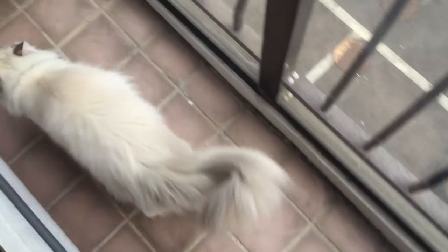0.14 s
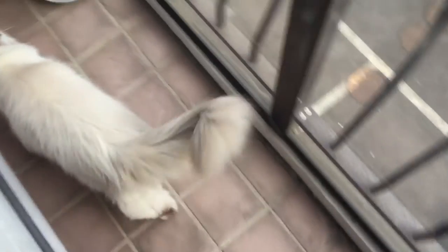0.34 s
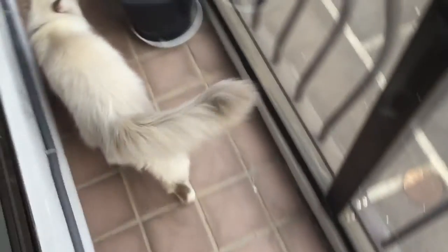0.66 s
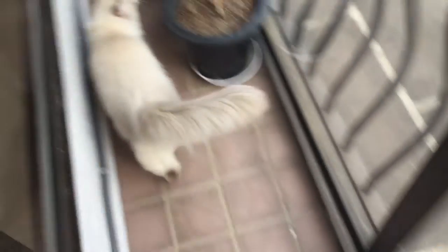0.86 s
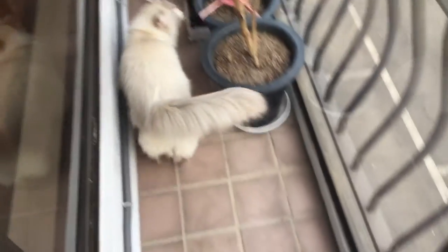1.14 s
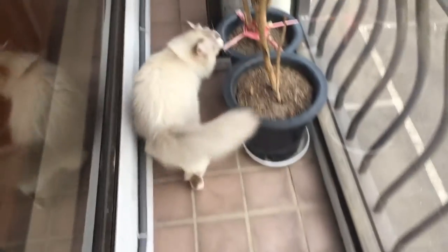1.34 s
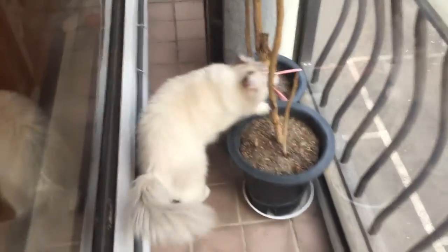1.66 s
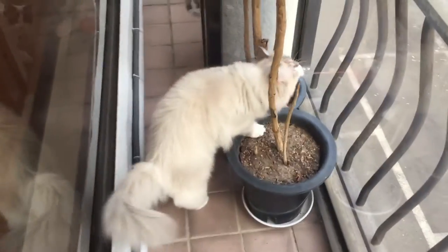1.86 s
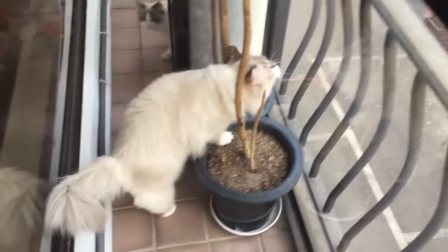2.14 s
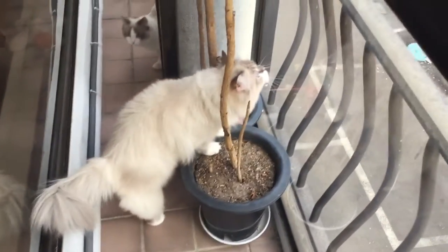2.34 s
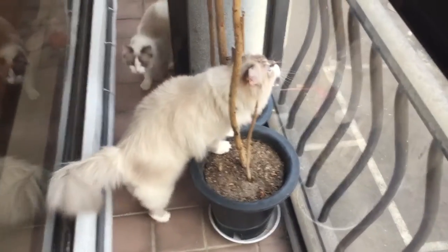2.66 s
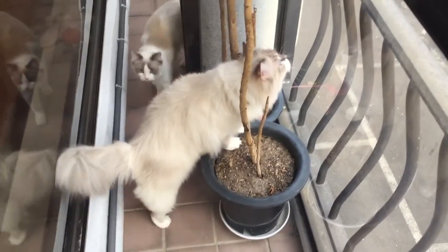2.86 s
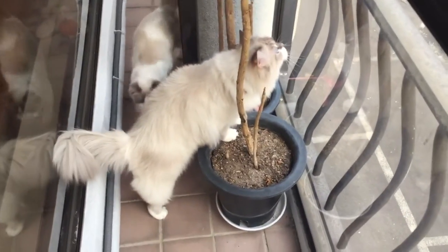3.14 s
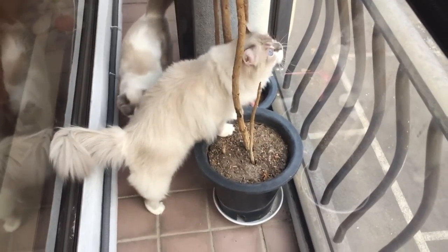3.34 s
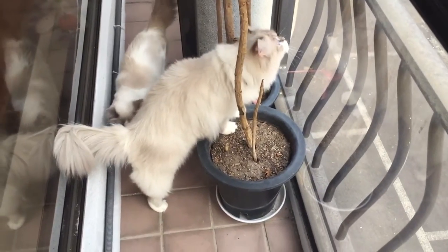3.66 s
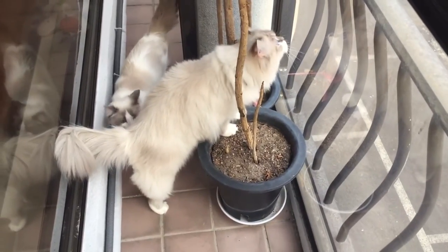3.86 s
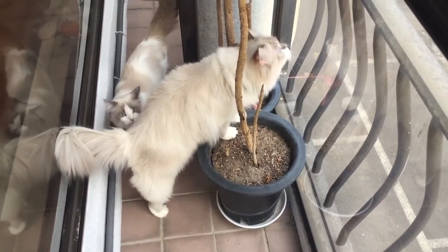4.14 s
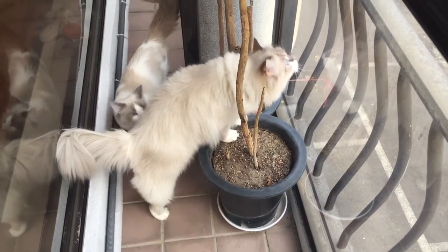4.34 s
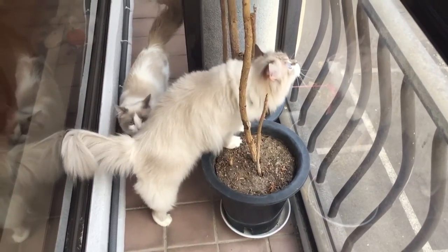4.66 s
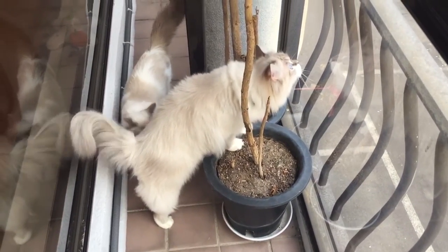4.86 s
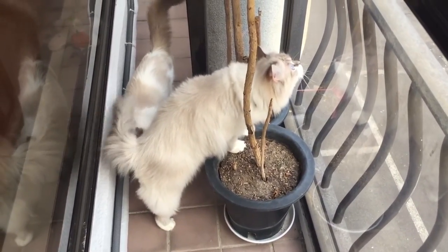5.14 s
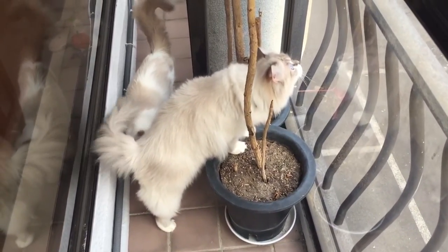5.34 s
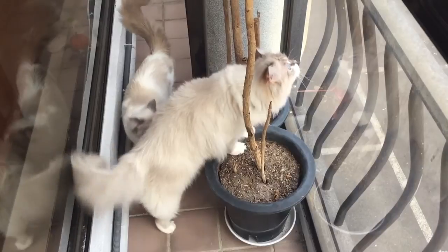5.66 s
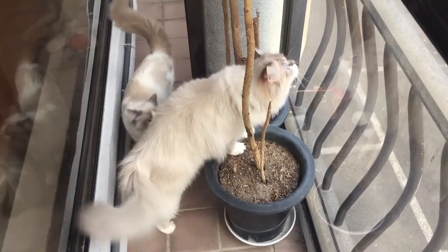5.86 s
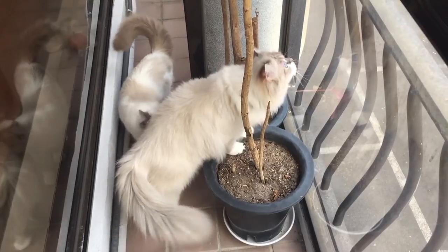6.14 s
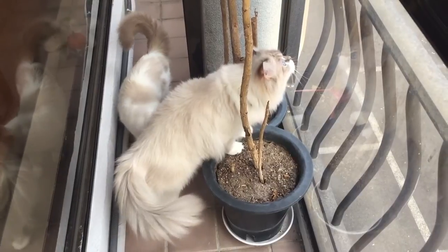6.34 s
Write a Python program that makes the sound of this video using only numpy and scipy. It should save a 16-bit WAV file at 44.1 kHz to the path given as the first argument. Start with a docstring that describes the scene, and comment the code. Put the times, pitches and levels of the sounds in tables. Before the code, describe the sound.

Close on a tiled balcony: dragging soles, small squeaky pips and a hard slap come first, then a cat's rough-edged meow. Shuffling resumes with lighter hollow slaps, ticks and a fading little rattle. The feet go quiet and the cat calls again, thin and wavering, then short and clear, then long and rising. Distant traffic rumbles low throughout.

```python
"""Cat on a tiled balcony

Near: a cat meows four times, partials of its voice shaped by throat and mouth resonances; the last is held long.
Slippers scuff the tiles as bursts of hiss and grainy rasp, and slap them as a crack over short hollow modes.
Brief pips are friction through a narrow resonance; struck modes tick, and something small rattles to rest.
Feedback delays give the balcony's echo; far off, traffic rumbles as filtered noise under it all."""
import sys
import numpy as np
from scipy import signal
from scipy.fft import rfft, irfft, next_fast_len
from scipy.io import wavfile
from scipy.ndimage import uniform_filter1d, minimum_filter1d

SR = 44100
rng = np.random.default_rng(int(sys.argv[2]) if len(sys.argv) > 2 else 0)


def wav_out(sig):
    """Save sig, one row per channel (or a flat mono array), as 16-bit PCM at SR to the path in sys.argv[1]."""
    wavfile.write(sys.argv[1], SR, np.round(np.clip(np.atleast_2d(sig).T, -1, 1) * 32767).astype(np.int16))


N = 286650

# distant street, spectrum: pitch_hz, level_db (per Hz)
STREET_SPECTRUM = [(12, -45.5), (20, -22), (60, 1), (98, -12.5), (150, -14.5), (177, -25), (210, -25.5),
                   (319, -22), (347, -38), (513, -37), (590, -41.5), (1190, -43), (1610, -44.5),
                   (6180, -54), (16000, -60.5)]
# distant street over time: start_s, rumble_db, road_noise_db
STREET_LEVELS = [(0, -58, -67.5), (.55, -54, -67), (.9, -51.5, -67), (1.2, -54, -70), (1.65, -50, -62.5),
                 (2.8, -52.5, -69), (3.1, -53.5, -66.5), (3.85, -57.5, -68.5), (5.05, -52, -79),
                 (5.8, -54, -69.5), (6.5, -54, -69)]
AIR_DB = -69.5

# soles dragged over tile: start_s, attack_s, hold_s, release_db_per_s, hiss_db, rasp_db (re hiss)
SCUFFS = [(-.01, 0.0087, 0.028, 207, -66, 3.5), (0.294, 0.041, 0.052, 194, -53.5, -0.5),
          (0.444, 0.014, .01, 220, -68.5, 4), (.55, 0.014, 0.0038, 294.5, -74.5, 0),
          (0.707, .01, 0.049, 200, -79, 12), (0.77, 0.0093, 0.06, 243, -50.5, 2),
          (0.891, 0.057, 0.029, 146, -53, 1.5), (1.017, 0.027, 0.009, 348, -60.5, -13),
          (1.224, 0.022, 0.012, 252, -69, 11), (1.36, 0.14, .05, 123, -75, 12),
          (1.651, 0.054, 0.016, 225, -68.5, 3), (1.754, 0.032, 0.0091, 280, -67, 3.5),
          (1.839, 0.011, 0.058, 303, -66.5, 2), (1.993, 0.0071, 0.04, 325, -77.5, 14),
          (2.117, .003, .02, 156, -62.5, 7), (2.122, 0.043, 0.016, 300, -47, -6),
          (2.226, 0.0088, 0.0079, 137, -68.5, 6), (2.335, 0.022, 0.0055, 98, -71, -3)]
# fine treble hiss of a scuff: pitch_hz, level_db (per Hz)
HISS_SPECTRUM = [(2500, -29.5), (5000, 1), (7000, -1), (10000, -2), (10500, -7.5), (12000, -3),
                 (16000, -4.5)]
# coarser, lower rasp of a scuff: pitch_hz, level_db (per Hz)
RASP_SPECTRUM = [(300, -12), (800, -9.5), (1500, 2), (2500, 0), (4000, -0.5), (6000, -11.5), (10000, -30.5)]
SCUFF_RISE_DB = 27.5   # climb over one attack time
RASP_RELEASE = 0.75   # the rasp dies at this share of the hiss's rate
# grit cracking under the sole; the rasp's colour comes in patches
CRACKLES_PER_S, CRACKLE_DB, CRACKLE_CAP, PATCHY_DB = 230, -9, 3.0, 3

# short pitched pips: start_s, friction_db, pitch_hz, friction_t60_s
CHIRPS = [(0.1, -70, 1050, .06), (0.148, -73, 1050, .06), (0.372, -68, 1650, 0.063),
          (0.7324, -71, 1950, 0.027), (0.7387, -64.5, 1880, 0.034), (0.7524, -63, 1780, 0.03),
          (0.764, -61, 1660, 0.023), (1.0036, -60, 1470, 0.021), (2.2395, -60.5, 2310, 0.037),
          (2.2507, -59.5, 1840, 0.03), (2.2693, -66.5, 1740, 0.03)]
CHIRP_RING_T60_S = 0.035

# lone ticks: start_s, level_db
TICKS = [(0.4559, -46.5), (1.7893, -56), (2.0198, -46), (2.0373, -51)]
# modes of the small ticking thing: pitch_hz, level_db, t60_s
TICK_MODES = [(2590, 1, 0.017), (3240, -3, 0.009), (4270, -1, 0.016), (5500, -6, 0.012), (6900, -18, .006)]
RATTLE_S, BOUNCE_S, BOUNCE_SHRINK = 2.295, .0475, .955   # first bounce, first gap, each gap re the last
RATTLE_DB, BOUNCE_LOSS_DB = -55, 1.6

# soles landing on tile: start_s, level_db, hollow_thud_db (re level)
SLAPS = [(0.777, -21.5, -19), (0.866, -43.5, -13.5), (1.856, -36.5, -3), (2.122, -32.5, 2.5)]
# sharp crack of a landing sole: pitch_hz, level_db, t60_s
CRACK_MODES = [(1680, 1.5, 0.0047), (2930, -26, 0.0018), (700, -13, 0.0092)]
# hollow thud of a landing sole: pitch_hz, level_db, t60_s
SOLE_MODES = [(334, -1, 0.035), (665, -11.5, 0.054), (920, -13, 0.028), (2080, -25, .04)]

# one list a meow: start_s, pitch_hz, throat_db, jaw_opening (0-1), mouth_hz, mouth_db, middle_db,
# breath_db (re a partial, at partial 4)
MEOWS = [
    [(1.09, 300.4, -62, 0.26, 2290, -87, -96, 6), (1.155, 397, -45, 0.09, 2220, -70, -99, 7),
     (1.195, 442.3, -50, 0.67, 2240, -44, -79.5, -8), (1.214, 514.7, -42, 0.74, 2160, -33, -73, -10),
     (1.25, 513, -43.5, .75, 2040, -42.5, -68, -11), (1.275, 575, -50, 0.53, 2600, -50, -63, -14),
     (1.335, 609, -43, 0.97, 2460, -36, -55, -16), (1.363, 577.6, -46.5, 0.78, 2380, -43.5, -57, -2),
     (1.395, 601.6, -37, .95, 2500, -28.5, -55, -25), (1.415, 599, -35.5, 1, 2410, -47.5, -45.5, -7),
     (1.43, 587.5, -38.5, 0.8, 2390, -48, -52, -4), (1.445, 569, -42, 0.88, 2350, -39.5, -48, -4.5),
     (1.465, 585.3, -41.5, 0.83, 2530, -34, -38.5, -8), (1.49, 550.8, -41, 0.83, 2440, -35.5, -35.5, -13),
     (1.53, 575.7, -46, 0.81, 2450, -42.5, -51.5, -8), (1.573, 595.5, -48.5, 0.84, 2470, -49, -63, -0.5),
     (1.66, 595, -68, 0.79, 2530, -72, -77, -6), (1.74, 596, -85, 0.35, 2494, -87, -85, -2)],
    [(2.785, 464, -65, .1, 1967, -87, -94, -3), (2.8, 448, -45, 0.19, 1950, -76, -98, 7.5),
     (2.835, 391.4, -53, 0.11, 1880, -60, -87, -5), (2.895, 423.2, -46, 0.39, 2117, -39, -64, -25),
     (2.967, 453.8, -43.5, 0.47, 2305, -33, -59.5, -26), (3.1, 494.5, -48, 0.67, 2277, -39.5, -71, -14.5),
     (3.135, 499.4, -53.5, 0.73, 2310, -43, -69.5, -6), (3.22, 533.7, -59, 0.81, 2120, -49.5, -65, -16),
     (3.29, 540.3, -59, 0.88, 2070, -50.5, -69, -14), (3.33, 551.2, -78, 0.68, 2100, -76, -95, -11),
     (3.4, 535, -94, .7, 2200, -87, -100, -18), (3.55, 564, -88, 0.73, 2190, -88, -96, -18)],
    [(4.015, 514, -74, .3, 2166, -84, -92, 2), (4.029, 494, -46.5, 0.24, 2204, -81, -94, 3),
     (4.061, 439.6, -47.5, 0.58, 2140, -52, -85, -16), (4.097, 424.5, -36, 0.49, 2260, -39.5, -58.5, -19),
     (4.151, 431.2, -39, .62, 2260, -42, -65, -30), (4.231, 450.2, -37, 0.68, 2285, -39.5, -66, -17),
     (4.26, 479, -40, 0.69, 2200, -46, -71, -8.5), (4.319, 531, -38, 0.83, 2093, -54, -67, -6.5),
     (4.359, 563, -37, .45, 2097, -67, -77, -21), (4.403, 580.6, -37, 0.41, 2200, -73, -87, -11),
     (4.461, 575.3, -72, 0.4, 2300, -85, -93, -4), (4.6, 563, -93, 0.5, 2300, -92, -92, -10)],
    [(5.375, 500, -79, .4, 2052, -77, -91, 5), (5.387, 482, -50, 0.32, 2040, -67.5, -88, 3.5),
     (5.431, 400.8, -47.5, 0.6, 2010, -28, -67, -26), (5.471, 395.3, -43.5, 0.6, 2140, -33, -67, -23),
     (5.531, 442.5, -38.5, 0.55, 2460, -29.5, -66, -19.5),
     (5.669, 524.7, -43.5, 0.74, 2630, -37.5, -61, -11), (5.727, 596.3, -42, 0.54, 2496, -56, -63.5, -13.5),
     (5.807, 615.5, -52, 1, 2190, -52, -69, -8.5), (5.85, 618.3, -58, 0.78, 2180, -55, -73, -16),
     (5.92, 612, -49.5, 0.95, 2140, -55, -72.5, -17), (5.974, 610.7, -42, 0.52, 2283, -56, -78, -19),
     (6.06, 607.4, -34.5, 0.48, 2313, -54.5, -64.5, -23),
     (6.194, 607.3, -38.5, 0.52, 1992, -63.5, -66.5, -19),
     (6.258, 603.4, -57.5, 0.93, 1960, -57.5, -81.5, -2.5), (6.33, 615.6, -66, 0.9, 1950, -79, -90, -1),
     (6.45, 613, -93, 0.57, 1996, -93, -89, -13)],
]
# one row a meow: half_pitch_db (re neighbouring partials), flutter_db (at partial 4), pitch_wobble (share),
# mouth_width_hz, middle_width_hz
VOICES = [(-21, 3, .008, 980, 820), (-31, 2.5, .004, 776, 1040), (-41, 2.5, 0.0042, 760, 800),
          (-31, 1.18, .003, 840, 1000)]
# the voice breaks into uneven cycles: start_s, end_s, half_pitch_db
VOICE_BREAKS = [(1.09, 1.228, -4.5), (1.415, 1.44, -6), (3.099, 3.447, -1.5), (4.247, 4.325, -24),
                (6.2, 6.346, -15)]
# hum through the nose, on the lowest partial: start_s, level_db
NOSE_HUM = [(1.09, -80), (1.16, -49.5), (1.195, -65), (1.215, -55), (1.25, -58), (1.275, -44), (1.3, -52),
            (1.415, -49), (1.43, -61.5), (1.46, -47), (1.49, -60), (1.573, -55), (1.66, -67), (1.74, -82),
            (2.785, -68), (2.8, -52), (2.835, -63), (2.855, -52), (2.895, -59.5), (3.05, -62), (3.105, -69),
            (3.135, -53), (3.21, -42.5), (3.3, -43), (3.325, -36.5), (3.4, -62), (3.55, -83), (4.015, -92),
            (4.029, -45), (4.06, -59.5), (4.15, -51), (4.23, -58.5), (4.32, -44.5), (4.355, -34),
            (4.4, -40.5), (4.46, -63), (4.6, -80.5), (5.375, -76), (5.387, -51), (5.43, -62), (5.47, -53),
            (5.53, -69), (5.665, -52.5), (5.69, -40.5), (5.807, -53.5), (5.835, -79), (5.92, -67),
            (5.974, -48.5), (6.22, -45.5), (6.26, -43.5), (6.3, -59.5), (6.45, -81.5)]
# middle resonance, moved by the tongue: start_s, pitch_hz
MIDDLE_RESONANCE = [(1.09, 3540), (1.4, 3550), (1.49, 3360), (1.56, 3390), (1.74, 3450), (2.8, 3790),
                    (2.9, 4240), (2.98, 4370), (3.08, 4890), (3.16, 4184), (3.3, 4042), (4.05, 4480),
                    (4.1, 4650), (4.16, 5240), (4.3, 4830), (4.4, 4687), (5.4, 4300), (5.5, 4300),
                    (5.65, 3900), (5.79, 3950), (6.0, 4000), (6.07, 4510), (6.22, 4100)]
# top resonance: start_s, pitch_hz, level_db
TOP_RESONANCE = [(1.09, 5600, -100), (1.19, 5500, -86), (1.26, 5500, -66), (1.3, 5250, -72),
                 (1.36, 5300, -64), (1.42, 4900, -71), (1.47, 4850, -64), (1.575, 5000, -61),
                 (1.66, 5200, -95), (2.82, 5600, -104), (2.95, 5800, -71), (3.12, 5900, -73),
                 (3.25, 5600, -79), (3.33, 5600, -102), (4.05, 6000, -104), (4.17, 6250, -69),
                 (4.27, 6200, -73), (4.4, 6000, -100), (5.39, 5000, -100), (5.43, 5000, -69),
                 (5.5, 4900, -69), (5.6, 5500, -63), (5.68, 6000, -64), (5.76, 6050, -68),
                 (5.85, 6000, -88), (6.18, 5200, -88), (6.25, 5200, -78), (6.33, 5400, -84),
                 (6.45, 5400, -92)]
# faint highest resonances: pitch_hz, width_hz, level_db (re top resonance)
FAINT_RESONANCES = [(6380, 730, -10), (8840, 900, -24), (12940, 2100, -31)]
TOP_WIDTH_HZ = 1200
# the throat resonance climbs from shut to open with the jaw
SHUT_HZ, OPEN_HZ, THROAT_WIDTH_HZ, THROAT_SKIRT = 391.8, 1910, 322, 0.79
THROAT_LOW = .3   # share of the lowest partial that leaves by the mouth
WOBBLE_HZ, FLUTTER_HZ, BREATH_HZ = 40.2, 24.39, 250   # how fast each drifts
BREATH_RISE, FLUTTER_RISE = 1.3, 0.49   # powers by which each grows up the partials
BREAK_EDGE_S = 0.066
PARTIALS, HALF_PARTIALS = 32, 12

BALCONY_T60_S, WALL_CUT_HZ, BALCONY_DB = 0.29, 4730, -12
CUTOFF_HZ = 16300


def from_db(db):
    """Decibels to amplitude."""
    return 10 ** (np.asarray(db) / 20)


def rms_one(x):
    """Scale to an rms of 1."""
    return x / np.sqrt(np.mean(x ** 2) + 1e-20)


def in_time(rows):
    """Draw each column as straight lines over the whole scene; the first column is time in s."""
    s, *columns = np.transpose(rows)
    return [np.interp(np.arange(N) / SR, s, c) for c in columns]


def sounding(tables, fade_s):
    """1 inside the time span of any table, 0 outside, with soft edges; tables that nearly touch are joined."""
    on = np.zeros(N)
    for rows in tables:
        on[round(rows[0][0] * SR):round(rows[-1][0] * SR) + 1] = 1
    widened = -minimum_filter1d(-on, size=SR // 14)
    joined = minimum_filter1d(widened, size=SR // 14)
    return uniform_filter1d(joined, size=max(int(fade_s * SR), 1))


def drift(rate_hz):
    """Slow chance of spread 1: noise twice through a one-pole low-pass, run in."""
    r = np.exp(-2 * np.pi * rate_hz / SR)
    noise = rng.standard_normal(N + 9000)
    return rms_one(signal.lfilter([1], [1, -2 * r, r * r], noise)[9000:])


def coloured(spectrum):
    """Steady noise with the given spectrum; rms 1."""
    hz, points = np.maximum(np.fft.rfftfreq(N, 1 / SR), 1), np.array(spectrum)
    shape_db = np.interp(np.log(hz), np.log(points[:, 0]), points[:, 1])
    return rms_one(irfft(rfft(rng.standard_normal(N)) * from_db(shape_db), N))


def band(x, low_hz, high_hz):
    """Keep what lies between two frequencies."""
    return signal.sosfilt(signal.butter(3, [low_hz, high_hz], "band", fs=SR, output="sos"), x)


def ring(clicks, hz, t60):
    """A damped resonator: a unit click sets a sine of height 1 ringing."""
    r, w = from_db(-60 / (t60 * SR)), 2 * np.pi * hz / SR
    return signal.lfilter([0, np.sin(w)], [1, -2 * r * np.cos(w), r * r], clicks + 1e-18)


def strike(events, modes, spread_db):
    """Each blow strikes every mode with a strength of its own."""
    events, out = np.array(events), np.zeros(N)
    at = np.round(events[:, 0] * SR).astype(int)
    luck = rng.standard_normal((len(events), len(modes)))
    for k, (hz, level_db, t60) in enumerate(modes):
        clicks = np.zeros(N)
        clicks[at] = from_db(events[:, 1] + level_db + spread_db * luck[:, k])
        out += ring(clicks, hz, t60)
    return out


def peak(hz, centre_hz, width_hz):
    """Gain of a pair of close resonances: broad top, steep skirts, dark valleys."""
    return 1 / (1 + np.square(np.square(2 * (hz - centre_hz) / width_hz)))


def street():
    """Distant traffic as filtered noise: lumpy low rumble, road noise above it, and smooth steady air."""
    rumble_db, road_db = in_time(STREET_LEVELS)
    noise = coloured(STREET_SPECTRUM)
    rumble = from_db(rumble_db + 1.5 * drift(3)) * rms_one(band(noise, 22, 190))
    road = from_db(road_db) * rms_one(band(noise, 198.4, 404))
    air = from_db(AIR_DB + 1.0 * drift(4.4)) * rms_one(band(noise, 450, 21000))
    return rumble + road + air


def scuffs():
    """Soles dragged over gritty tile: a fine hiss and a coarser, slightly grainy rasp that lingers."""
    t, hiss_power, rasp_power = np.arange(N) / SR, 0, 0
    for start, attack, hold, release, db, rasp_db in SCUFFS:
        rise_db = db + SCUFF_RISE_DB * np.clip((t - start) / max(attack, 1 / SR) - 1, -9, 0)
        fall_db = release * np.maximum(t - start - attack - hold, 0)
        # doubled dB gives power, so overlapping scuffs add as noise does
        hiss_power = hiss_power + from_db(2 * (rise_db - fall_db))
        rasp_power = rasp_power + from_db(2 * (rise_db + rasp_db - RASP_RELEASE * fall_db))
    crack_sizes = from_db(5.4 * np.minimum(rng.exponential(1, N), CRACKLE_CAP))
    cracks = (rng.random(N) < CRACKLES_PER_S / SR) * crack_sizes * rng.choice([-1, 1], N)
    grit = from_db(CRACKLE_DB) * rms_one(band(cracks, 1200, 7000))
    noise = coloured(RASP_SPECTRUM) * from_db(2.5 * drift(150))
    edges = np.geomspace(250, 12000, 7)
    for low, high in zip(edges, edges[1:]):
        grit = grit + from_db(PATCHY_DB * drift(20)) * band(noise, low, high)
    hiss = coloured(HISS_SPECTRUM) * from_db(1.56 * drift(60))
    return np.sqrt(hiss_power) * hiss + np.sqrt(rasp_power) * grit


def chirps():
    """Brief grainy pips near two kilohertz: a dying burst of friction through a narrow resonance."""
    out, noise = np.zeros(N), rng.standard_normal(N)
    since = np.arange(SR // 8) / SR
    for s, db, hz, t60 in CHIRPS:
        at = round(s * SR)
        burst = noise[at:at + len(since)] * from_db(-60 * since / t60)
        out[at:at + len(since)] += from_db(db) * ring(burst, hz, CHIRP_RING_T60_S)
    return out


def ticks():
    """Struck modes: lone ticks, and seven bounces that come ever sooner and softer."""
    k = np.arange(7)
    at = RATTLE_S + BOUNCE_S * (1 - BOUNCE_SHRINK ** k) / (1 - BOUNCE_SHRINK)
    bounces = list(zip(at, RATTLE_DB - BOUNCE_LOSS_DB * k))
    return strike(TICKS + bounces, TICK_MODES, spread_db=1.5)


def slaps():
    """A sharp crack as the sole lands, then the short hollow modes under it."""
    thuds = [(s, db + thud_db) for s, db, thud_db in SLAPS]
    return strike(SLAPS, CRACK_MODES, spread_db=2.5) + strike(thuds, SOLE_MODES, spread_db=5.0)


def cat():
    """Partials of the vocal folds under moving throat and mouth resonances; uneven cycles add half-pitch partials."""
    gate = sounding(MEOWS, fade_s=.01)
    on = gate > 0
    rows = [row + voice for meow, voice in zip(MEOWS, VOICES) for row in meow]
    controls = [c[on] for c in in_time(rows)]
    pitch, throat_db, jaw, mouth_hz, mouth_db, middle_db, breath_db = controls[:7]
    half_db, flutter_db, wobble, mouth_width, middle_width = controls[7:]
    hum_db, middle_hz = in_time(NOSE_HUM)[0][on], in_time(MIDDLE_RESONANCE)[0][on]
    top_hz, top_db = [c[on] for c in in_time(TOP_RESONANCE)]
    t = np.flatnonzero(on) / SR
    for start, end, db in VOICE_BREAKS:
        inside = np.clip(np.minimum(t - start, end - t) / BREAK_EDGE_S + .5, 0, 1)
        half_db = half_db + (db - half_db) * inside
    pitch = pitch * (1 + wobble * drift(WOBBLE_HZ)[on])
    phase = 2 * np.pi * np.cumsum(pitch) / SR

    # the throat shares its level among the lowest partials
    throat_hz = SHUT_HZ * (OPEN_HZ / SHUT_HZ) ** jaw
    offsets = [2 * (k * pitch - throat_hz) / THROAT_WIDTH_HZ for k in range(4)]
    skirts = [(1 + offset ** 2) ** -THROAT_SKIRT for offset in offsets]
    skirts[0] = skirts[1] * from_db(-55)   # entry 0 only helps set the lowest half-pitch partial
    total = np.sqrt(sum(np.square(skirts)))
    strengths = [from_db(throat_db) * s / total for s in skirts]
    strengths[1] = np.hypot(THROAT_LOW * strengths[1], from_db(hum_db))

    # a resonance shares its power among the partials inside it
    mouth = from_db(mouth_db) * np.sqrt(pitch / mouth_width)
    middle = from_db(middle_db) * np.sqrt(pitch / middle_width)
    top = from_db(top_db) * np.sqrt(pitch / TOP_WIDTH_HZ)
    for k in range(len(strengths), PARTIALS + 1):
        hz = k * pitch
        faint = sum(from_db(db) * peak(hz, at, width) for at, width, db in FAINT_RESONANCES)
        highest = peak(hz, top_hz, TOP_WIDTH_HZ) + faint
        lower = mouth * peak(hz, mouth_hz, mouth_width) + middle * peak(hz, middle_hz, middle_width)
        strengths.append(lower + top * highest)

    breaths = [from_db(breath_db) * drift(BREATH_HZ)[on] for _ in range(4)]
    flutters = [flutter_db * drift(FLUTTER_HZ)[on] for _ in range(5)]
    voice = np.zeros(len(pitch))
    for k in range(PARTIALS):
        rank = (k + 1) / 5
        flutter = from_db(rank ** FLUTTER_RISE * flutters[k % len(flutters)])
        # turbulent breath modulates each partial and fills the gaps between the lines
        noisy = rank ** BREATH_RISE * breaths[k % len(breaths)]
        if k > 0:
            voice += strengths[k] * (flutter + noisy) * np.sin(k * phase + .3 * k * k)
        if k < HALF_PARTIALS:
            between = from_db(half_db) * np.sqrt(strengths[k] * strengths[k + 1])
            voice += between * flutter * np.sin((k + .5) * phase)
    out = np.zeros(N)
    out[on] = np.sqrt(2) * voice   # sine levels are rms
    return out * gate


def balcony(x):
    """Eight feedback delays between glass, tiles and ceiling, duller on every round."""
    size = next_fast_len(N + SR)
    w = 2 * np.pi * np.fft.rfftfreq(size, 1 / SR)
    dull, echoes = 1 / (1 + 1j * w / (2 * np.pi * WALL_CUT_HZ)), 0
    for k, lag_s in enumerate(rng.uniform(.005, .028, 8)):
        loop = from_db(-60 * lag_s / BALCONY_T60_S) * dull * np.exp(-1j * w * lag_s)
        echoes = echoes + (-1) ** k * loop / (1 - loop)
    return irfft(rfft(x, size) * echoes, size)[:N]


def scene():
    """Near sounds with their balcony echo, over the distant street, which has none."""
    near = scuffs() + chirps() + ticks() + slaps() + cat()
    return (near + from_db(BALCONY_DB) * balcony(near) + street())[None]


def record(dry):
    """A steep low-pass: from the cutoff up, everything is at least 60 dB down."""
    return signal.sosfilt(signal.cheby2(16, 60, CUTOFF_HZ, fs=SR, output="sos"), dry)


dry = scene()
out = record(dry)
wav_out(out)
```